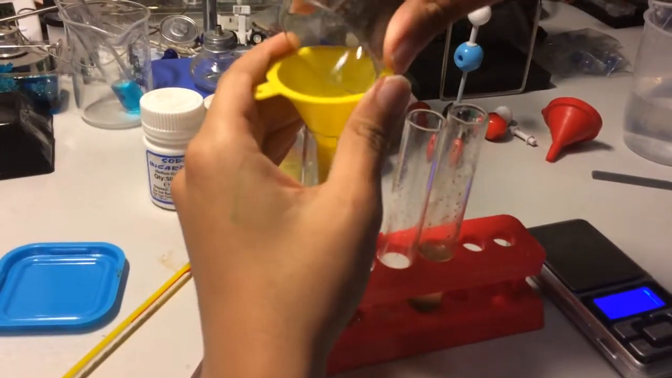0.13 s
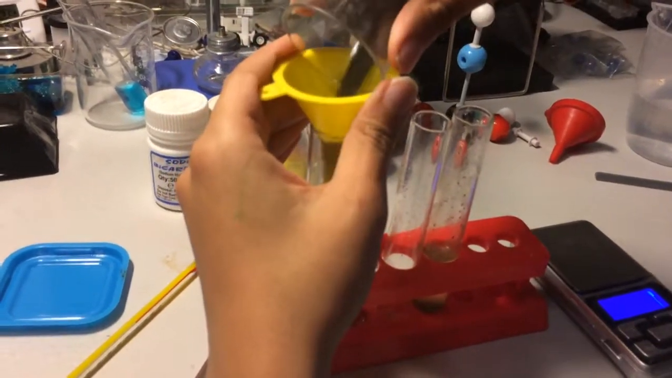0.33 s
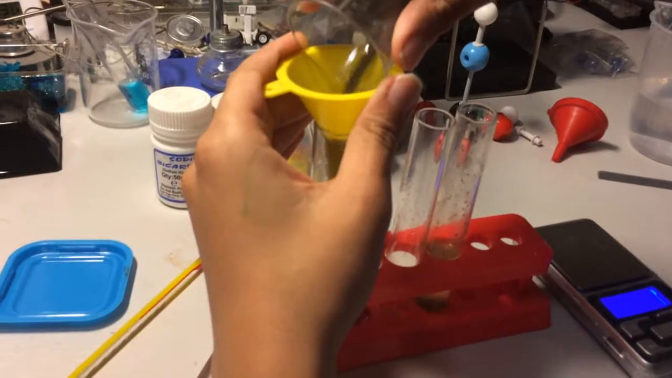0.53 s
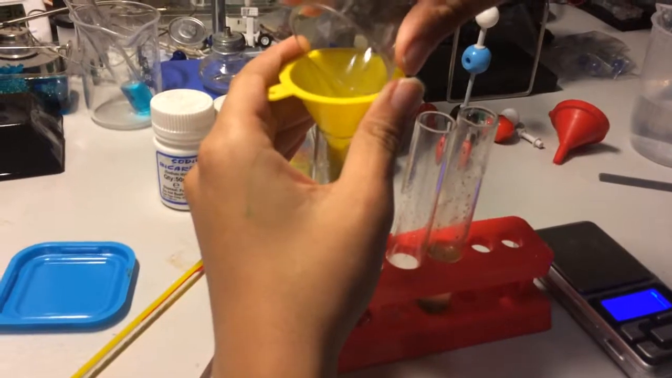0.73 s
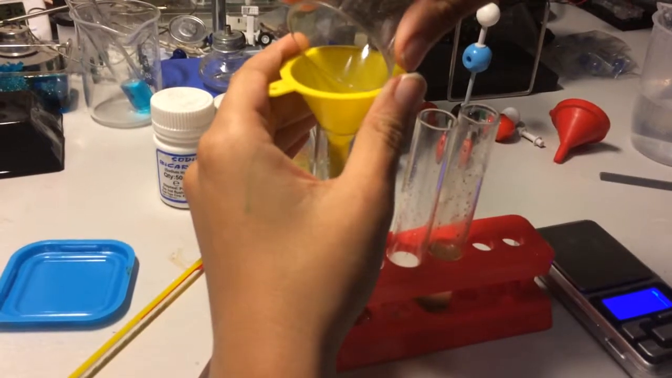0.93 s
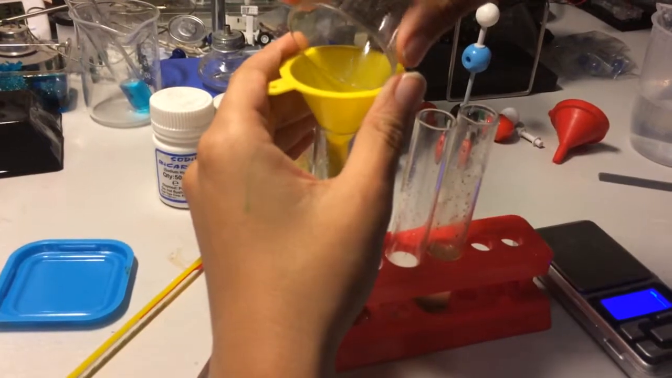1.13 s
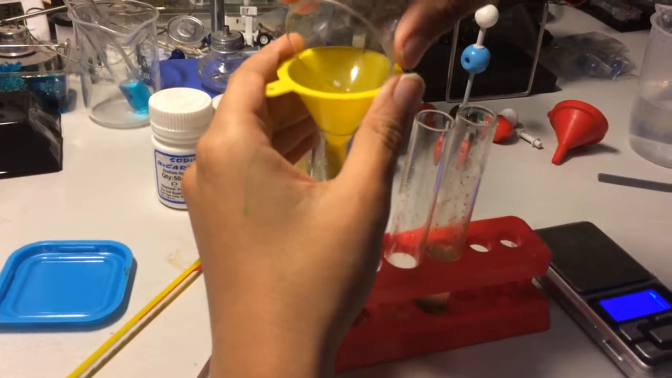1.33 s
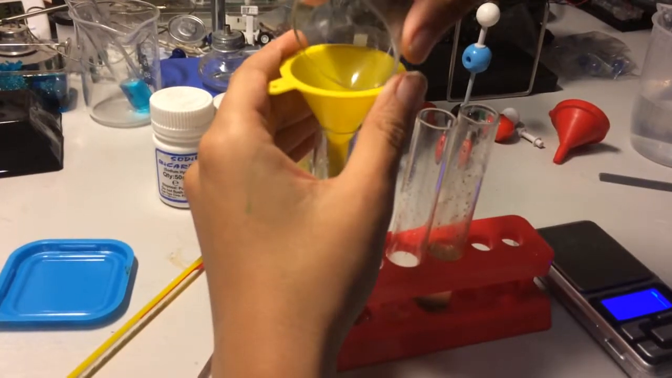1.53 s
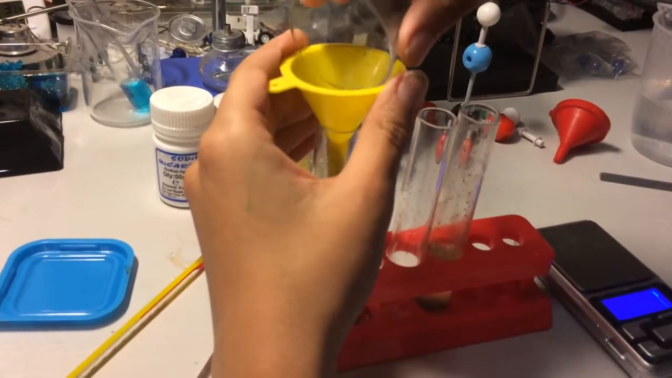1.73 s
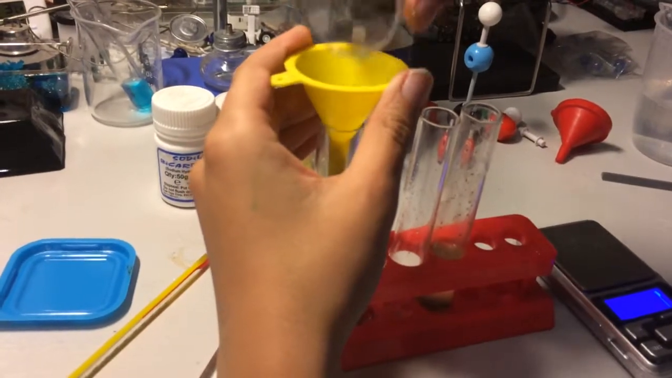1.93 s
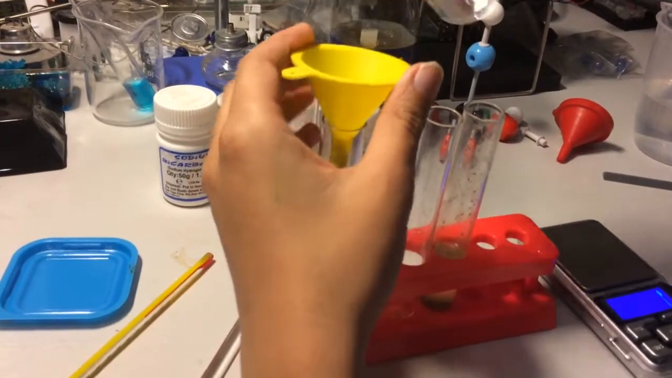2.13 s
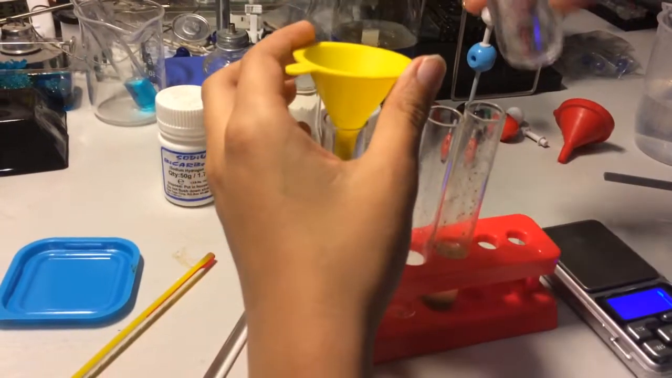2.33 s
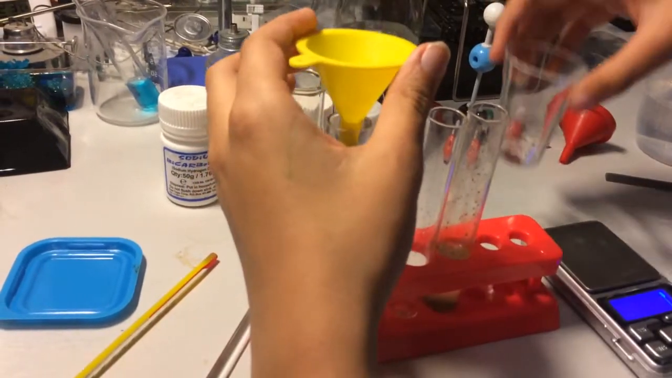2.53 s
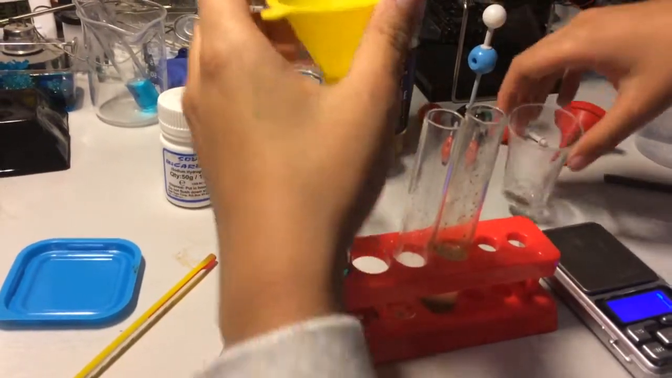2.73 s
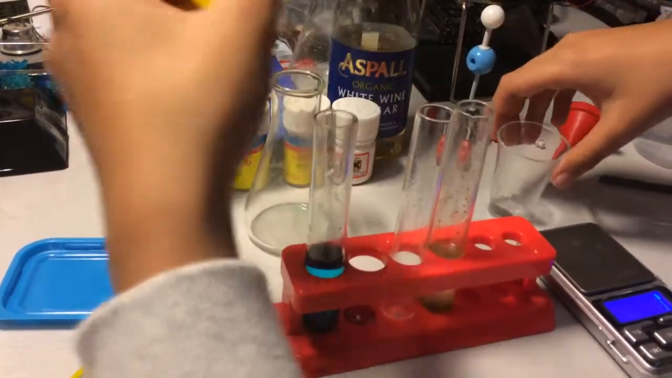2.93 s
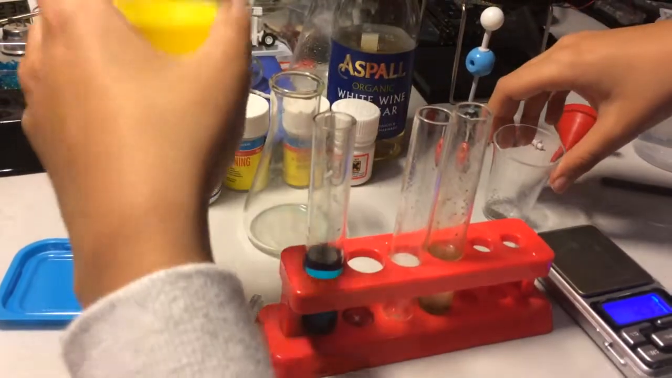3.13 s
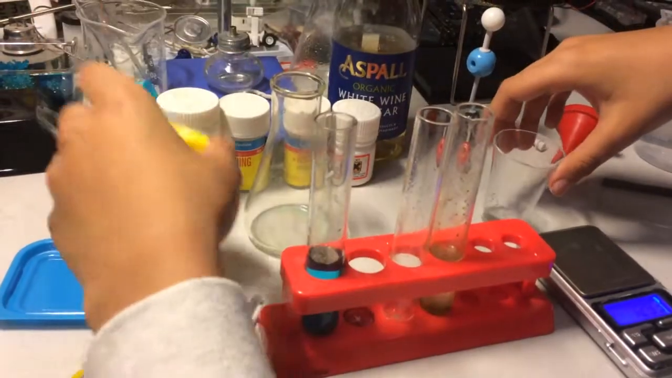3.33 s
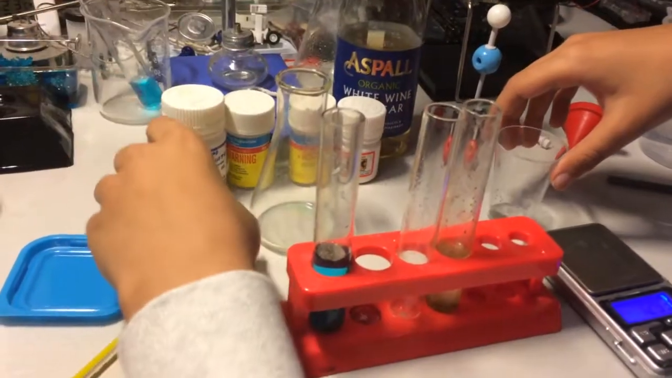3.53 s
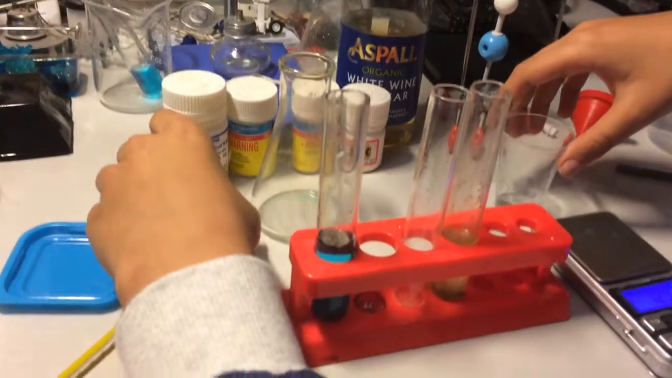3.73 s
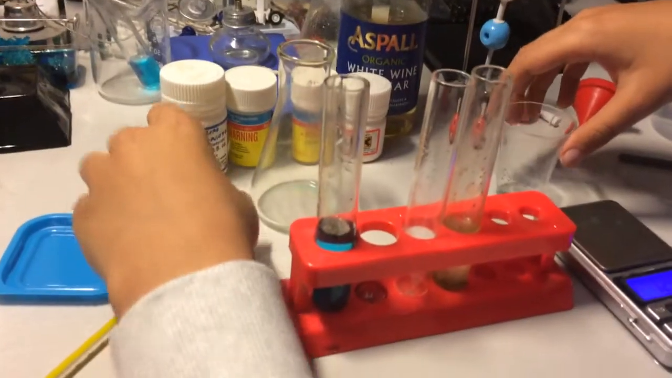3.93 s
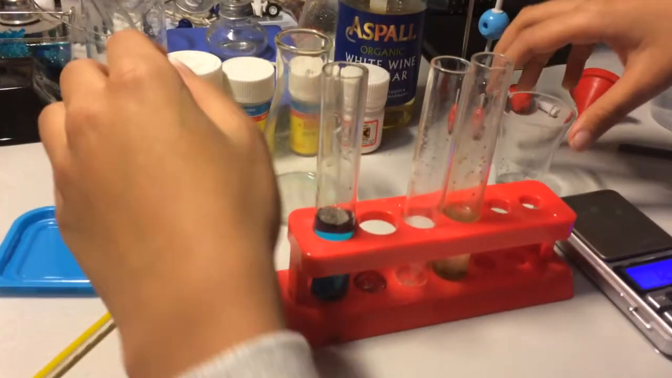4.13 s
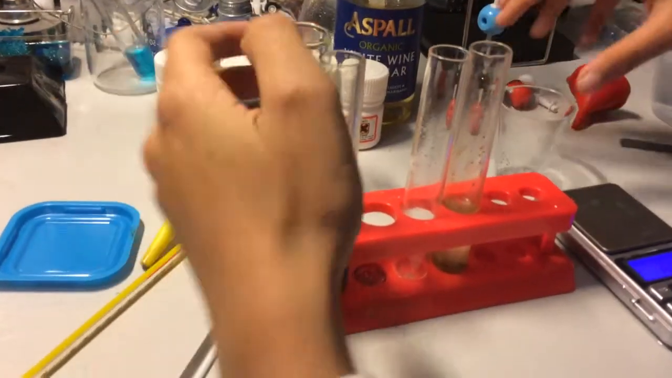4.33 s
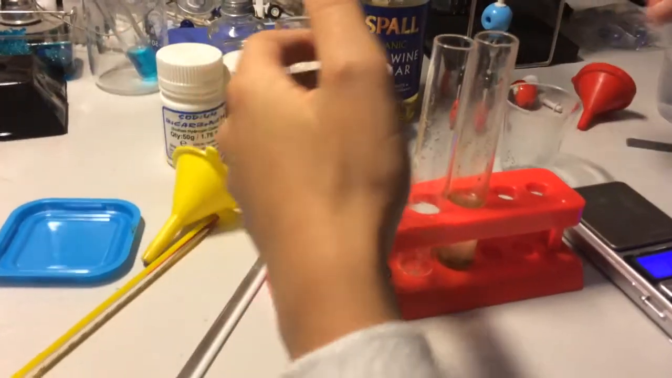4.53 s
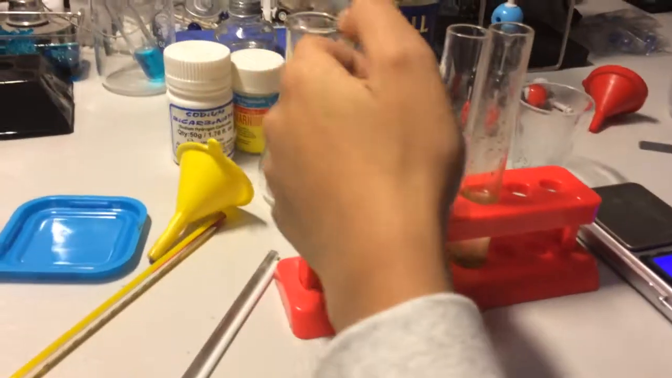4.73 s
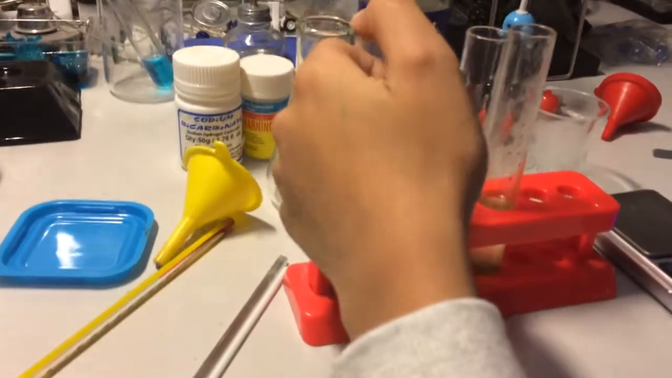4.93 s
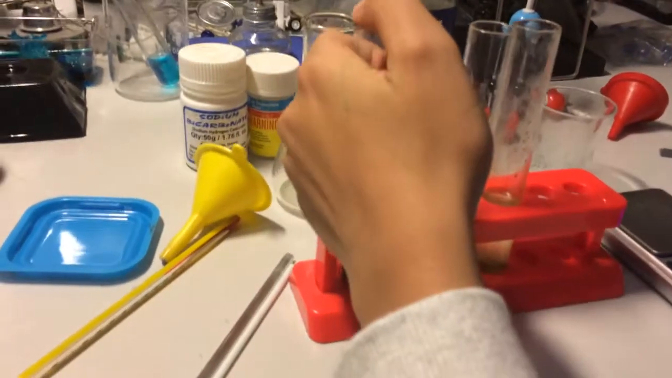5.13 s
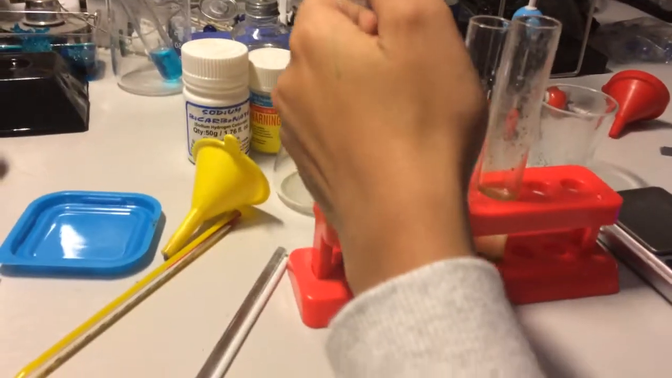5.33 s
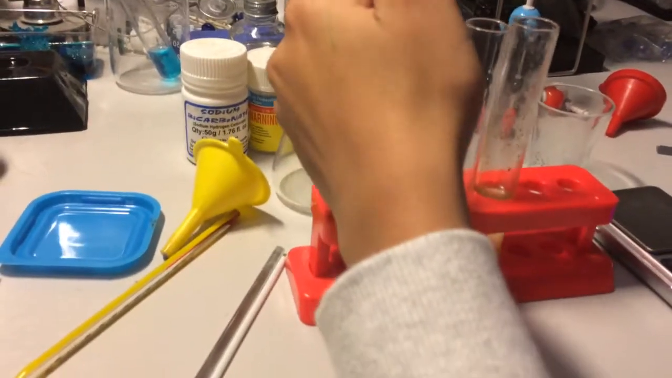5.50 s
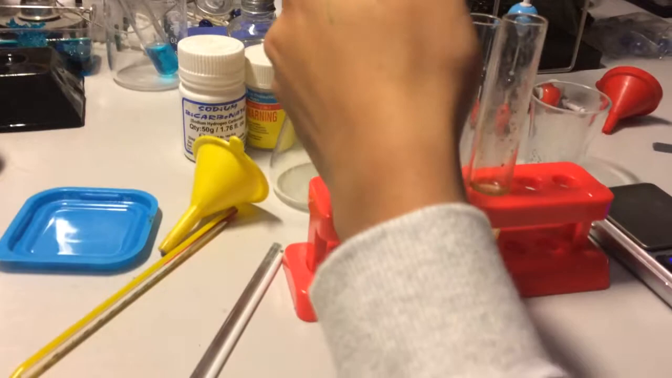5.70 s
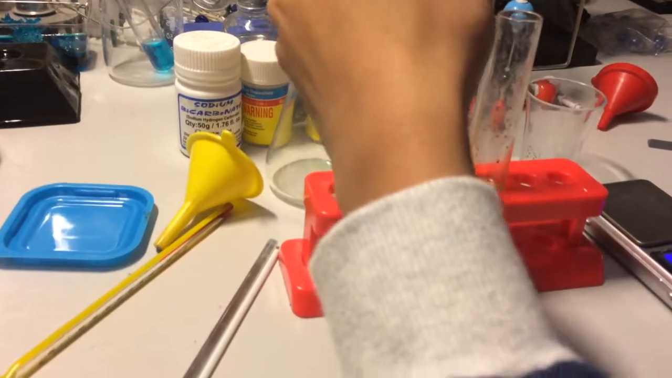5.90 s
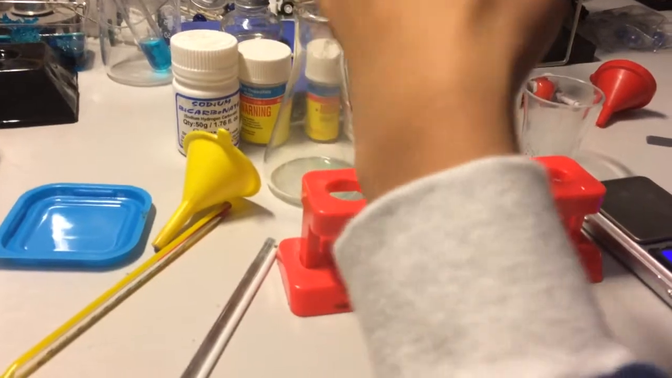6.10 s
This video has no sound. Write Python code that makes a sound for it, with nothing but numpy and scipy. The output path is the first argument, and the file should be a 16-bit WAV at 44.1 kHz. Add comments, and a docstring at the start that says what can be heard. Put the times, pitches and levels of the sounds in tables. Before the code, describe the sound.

Close view of a tabletop in a small room with low, quiet air and mains hum. A very faint grainy hiss of filings fades within a second, followed by light taps on a plastic funnel. A beaker is set down with a sharp chattering knock, then a funnel clacks. Faint distant clicks recur. Finally a glass tube scrapes, knocks hard once in a plastic rack, and rattles, with a tiny clink and squeak.

```python
"""Table in a small room: iron filings hiss from a beaker through a plastic funnel into a test tube (random grains).
The beaker ticks on the funnel and is set down in quick hops; sleeves brush (sparser grains). The tube scrapes,
knocks and rattles in a plastic rack (damped modes and noise cracks), glass clinks on glass and squeaks.
A far switch clicks as echoing noise, over room air and a wavering mains hum."""
import sys
import numpy as np
from scipy import signal
from scipy.fft import rfft, irfft
from scipy.io import wavfile

SR = 44100
rng = np.random.default_rng(int(sys.argv[2]) if len(sys.argv) > 2 else 0)


def wrap_up_sound(samples):
    """Save the sound to the file named by the first command line argument, as 16-bit audio."""
    columns = np.atleast_2d(samples).T
    # keep every value between -1 and 1, then stretch to whole-number steps
    tamed = np.clip(columns, -1, 1)
    steps = np.round(tamed * 32767).astype(np.int16)
    wavfile.write(sys.argv[1], SR, steps)


N = 271700
TIME = np.arange(N) / SR
AGE = np.arange(SR // 2) / SR  # life of one blow, s

# damped thud modes of the rack: freq_hz, level_db, t60_s
RACK_THUD = [(85, -19, .06), (480, -32, .015), (820, -13, .02), (1040, -2, .022), (1420, -7, .019),
             (1900, -15, .012), (2500, -20, .01), (3400, -21, .008), (5400, -19, .006)]


def amp(db):
    """Decibels to gain."""
    return 10 ** (np.asarray(db) / 20)


def unit(x):
    """Scale to rms 1."""
    return x / np.sqrt(np.mean(x ** 2))


def colour(x, points):
    """Filter by (freq_hz, gain_db) points, joined over log frequency; rms 1."""
    hz, db = np.transpose(points)
    bins_hz = np.maximum(np.fft.rfftfreq(len(x), 1 / SR), 1)
    gain = amp(np.interp(np.log(bins_hz), np.log(hz), db))
    return unit(irfft(rfft(x) * gain, len(x)))


def walk(rate_hz):
    """Random wander: straight lines between normal knots, rate_hz knots a second."""
    knots = rng.standard_normal(256)
    return np.interp(TIME * rate_hz, np.arange(len(knots)), knots)


def background(air_db=-61.0, waver_db=0.5):
    """Room air as coloured noise; mains hum and a faint high whine as sines wavering in level and phase."""
    # room air spectrum: freq_hz, density_db
    air_colour = [(25, -20.5), (50, -16.5), (110, -4.5), (150, -10), (210, -8.5), (300, -14.5), (450, -16),
                  (700, -19), (900, -16.5), (1400, -24), (2100, -24), (2900, -32.5), (6000, -37.5),
                  (14000, -42)]
    # steady tones: freq_hz, rms_db
    tones = [(100, -84), (120, -64.5), (212, -76), (240, -81.5), (12050, -88.5)]
    out = colour(rng.standard_normal(N), air_colour) * amp(air_db + .5 * walk(5.3))
    for hz, db in tones:
        level = np.sqrt(2) * amp(db + waver_db * walk(2.9))
        out += level * np.sin(2 * np.pi * hz * TIME + 0.18 * walk(1.1))
    return out


def grains(rate_hz, spread_db):
    """Tiny impacts of unequal size at random times, rate_hz a second on average."""
    hits = rng.random(N) < rate_hz / SR
    return hits * rng.standard_normal(N) * amp(spread_db * rng.standard_normal(N))


def strokes(rows, attack_s, release_s, sag_db_per_s=0):
    """Gain of (start_s, length_s, level_db) moves: each rises, holds or sags, and dies away."""
    gain = np.zeros(N)
    for start_s, length_s, db in rows:
        age = np.clip(TIME - start_s, 0, length_s)
        rise = np.minimum(age / attack_s, 1)
        fall = np.minimum((length_s - age) / release_s, 1)
        gain += amp(db + sag_db_per_s * age) * rise * fall
    return gain


def filings():
    """Dense grain impacts, a thin trickle and the main stream, coloured as a hiss."""
    # hiss spectrum: freq_hz, density_db
    hiss_colour = [(900, -17), (1500, -5), (2300, -12), (2950, 5), (3700, -6), (6000, -7), (9000, -7),
                   (11300, -9), (13000, -1), (14500, -5.5)]
    # trickle and main stream: start_s, length_s, level_db
    pours = [(.04, 0.99, -73.5), (.28, 0.58, -65)]
    hiss = colour(grains(rate_hz=8500, spread_db=0.0), hiss_colour)
    return hiss * strokes(pours, attack_s=0.074, release_s=0.23, sag_db_per_s=-8.5)


def fade(t60_s):
    """Exponential decay by 60 dB in t60_s."""
    return np.exp(-np.log(1000) * AGE / t60_s)


def add(out, start_s, sound):
    """Mix a sound in at a time."""
    start = int(start_s * SR)
    out[start:start + len(sound)] += sound[:N - start]


def switch(t60_s=0.2, echo_s=0.017, echo_width_s=0.0041, echo_db=0, rise_s=0.00039):
    """A far click, mostly reverberation: decaying noise with a strong wall echo; moving arms alter the paths."""
    # clicks: start_s, level_db, snap_db
    clicks = [(1.0732, -44.5, -19), (2.2391, -44.5, -19), (2.3121, -54.5, 9.5), (2.7707, -43, -18),
              (4.3448, -43, -18), (4.668, -41.5, -21), (4.8010, -43, -23), (4.856, -48, -28),
              (4.9931, -42, -27), (5.0835, -44, -41), (5.3034, -43, -41)]
    # body spectrum: freq_hz, density_db
    body_colour = [(150, -20.5), (500, -2.5), (1100, -10.5), (1450, -0.5), (1650, -7.5), (1900, 1.5),
                   (2300, -2.5), (2750, -11.5), (3550, -2), (4700, -9), (5800, -28.5), (6500, -16.5),
                   (7400, -55.5), (13500, -27)]
    # snap spectrum: freq_hz, density_db
    snap_colour = [(500, -1), (1800, -13.5), (2400, -5.5), (3600, -1.5), (5300, -1), (7200, -8),
                   (8350, -2.5), (9000, -6), (10000, -8), (10700, -23), (11600, -10), (12300, -3.5),
                   (13200, -24)]
    out = np.zeros(N)
    paths = rng.standard_normal(len(AGE))
    echo = amp(echo_db) * np.exp(-((AGE - echo_s) / echo_width_s) ** 2)
    echo += .5 * np.clip((AGE - echo_s) / 0.002, 0, 1)  # denser tail after the echo
    shape = fade(t60_s) * (1 + echo) * np.minimum(AGE / rise_s, 1)
    for start_s, db, snap_db in clicks:
        now = paths + rng.standard_normal(len(AGE))  # shared paths plus fresh ones
        click = colour(now, body_colour) + amp(snap_db) * colour(now, snap_colour)
        add(out, start_s, amp(db) * shape * click)
    return out


def soften(x, hz, order=2):
    """Low-pass: a longer contact takes the treble out of a blow."""
    return signal.sosfilt(signal.butter(order, min(hz, SR / 2.2), fs=SR, output="sos"), x)


def radiate(x, hz, order=1):
    """High-pass: small objects radiate little bass."""
    return signal.sosfilt(signal.butter(order, hz, "highpass", fs=SR, output="sos"), x)


def ring(modes, scatter):
    """Sum of decaying sine modes; scatter is the random phase range in cycles."""
    out = np.zeros(len(AGE))
    for hz, db, t60_s in modes:
        out += amp(db) * fade(t60_s) * np.sin(2 * np.pi * (hz * AGE + scatter * rng.random()))
    return out


def room(x, wet_db, t60_s, bright_hz):
    """Direct sound plus the short, dense noise tail of a small furnished room."""
    onset = np.clip((AGE - .002) / 0.0035, 0, 1)
    tail = soften(rng.standard_normal(len(AGE)), bright_hz) * fade(t60_s) * onset
    tail /= np.sqrt(np.sum(tail ** 2))
    return x + amp(wet_db) * signal.fftconvolve(x, tail)[:N]


def ticks(upper_t60_s=0.0055, crack_t60_s=0.018):
    """Hand-damped taps on the funnel: two short resonances and a noise crack."""
    # taps: start_s, level_db, ring_hz, ring_t60_s, upper_hz, upper_db, crack_db, contact_hz
    taps = [(1.632, -41.5, 1280, 0.01, 2930, -7, -10, 5000), (1.6709, -38, 1342, 0.04, 3030, 3, -4, 5500),
            (1.8402, -47, 1390, .015, 3000, -6, -11, 5000),
            (1.8589, -32, 1360, 0.025, 2900, 0.5, -12.5, 5950),
            (2.8676, -35, 894, 0.052, 1410, -6, 0, 1980), (3.5999, -52.5, 3540, 0.0077, 5160, 4, 0, 12800),
            (3.61, -41.5, 1190, 0.01, 3580, -1, -8, 11560), (3.9541, -37.5, 833, 0.021, 2840, 3, 1.5, 6950),
            (4.004, -21.5, 1820, 0.0056, 2400, -6.5, -15.5, 2900),
            (4.005, -28.5, 3260, 0.0091, 1480, -18.5, -4, 3600)]
    out = np.zeros(N)
    for start_s, db, hz, t60_s, upper_hz, upper_db, crack_db, contact_hz in taps:
        body = ring([(hz, 0, t60_s), (upper_hz, upper_db, upper_t60_s)], 0)
        crack = amp(crack_db) * rng.standard_normal(len(AGE)) * fade(crack_t60_s)
        add(out, start_s, amp(db) * soften(body + crack, contact_hz, order=4))
    return room(radiate(out, hz=754), wet_db=-11.5, t60_s=0.11, bright_hz=6990)


def brush():
    """Sleeve and fingers brushing: uneven grains, one stroke for each move of the arm."""
    # brushing spectrum: freq_hz, density_db
    cloth_colour = [(200, -10), (500, 1.5), (900, -5), (1500, -2.5), (2400, -15.5), (5000, -18),
                    (8000, -19.5), (14000, -28.5)]
    # arm moves: start_s, length_s, level_db
    moves = [(2.66, 0.39, -65), (3.24, 0.11, -65.5), (4.81, 0.11, -59), (5.24, 0.455, -60.5),
             (5.8, 0.073, -57)]
    rustle = colour(grains(rate_hz=3300, spread_db=4.5), cloth_colour)
    return rustle * strokes(moves, attack_s=0.024, release_s=.05)


def blow(thud, modes, contact_hz, ring_db, crack_db, crack_t60_s, tick_db, tick_t60_s, order=2):
    """Crack, damped thud and thin ring, dulled by the contact, under the bright noise tick of hard glass."""
    crack = amp(crack_db) * rng.standard_normal(len(AGE)) * fade(crack_t60_s)
    body = ring(thud, 0) + crack + amp(ring_db) * ring(modes, 0.88)
    hardness = min(contact_hz / 3000, 1) ** 2  # softer contacts tick less
    tick = amp(tick_db) * hardness * rng.standard_normal(len(AGE)) * fade(tick_t60_s)
    return soften(body, contact_hz, order) + soften(tick, hz=8500)


def beaker(count=4):
    """The base lands on its edge and chatters flat in ever shorter, weaker hops."""
    # landings: start_s, level_db, contact_hz, ring_db, first_hop_s, hop_ratio, step_per_hop_db
    landings = [(2.944, -35.5, 1500, -18, 0.00243, 0.81, -1), (2.962, -9.5, 6000, -4, .0053, .62, -0.5),
                (3.3912, -25.5, 1290, 9, .0046, .57, -1.5)]
    # broad thud modes: freq_hz, level_db, t60_s
    thud = [(400, -17, .035), (620, -28, .02), (1130, -13, .015), (1530, -2, .019), (1900, -5, .012),
            (2550, -11, .012), (3100, -17, .012), (5100, -18, .012), (7800, -22, .006), (10700, -4, .009)]
    # thin ring modes: freq_hz, level_db, t60_s
    modes = [(361, -29, .11), (404, -24, .1), (576, -30, .11), (694, -33, .11), (877, -31, .11),
             (958, -33, .11), (1082, -28, .11), (1136, -22, .1), (1314, -28, .12), (1420, -24, .1),
             (1516, -10, .1), (1760, -26, .11), (1927, -20, .08), (2202, -22, .06), (2471, -29, .07),
             (2627, -26, .06), (10640, -33, .12)]
    hop_contact_hz, hop_ring_step_db = 2880, -4  # hops: contact cut-off at most this, less ring each time
    out = np.zeros(N)
    for start_s, db, contact_hz, ring_db, first_hop_s, hop_ratio, step_db in landings:
        for k in range(count):
            hit = blow(thud, modes, contact_hz, ring_db + k * hop_ring_step_db, crack_db=-16.5,
                       crack_t60_s=0.031, tick_db=-35, tick_t60_s=0.018, order=3)
            add(out, start_s, amp(db + k * step_db) * hit)
            start_s += first_hop_s * hop_ratio ** k
            contact_hz = min(contact_hz, hop_contact_hz)
    return room(radiate(out, hz=385, order=3), wet_db=-11, t60_s=0.17, bright_hz=8300)


def rack_blow(contact_hz, ring_db, pitch_ratio):
    """One contact of glass and rack; the spot that is struck sets the pitch of the thud."""
    # thin ring modes: freq_hz, level_db, t60_s
    modes = [(390, -27, .12), (506, -33, .1), (610, -31, .1), (784, -22, .09), (852, -23, .1),
             (975, -23, .1), (1076, -18, .09), (1220, -20, .09), (1332, -22, .1), (1448, -20, .08),
             (1510, -19, .09), (1790, -26, .1), (1911, -27, .09), (2546, -31, .08), (3085, -32, .06)]
    thud = np.array(RACK_THUD) * [pitch_ratio, 1, 1]
    return blow(thud, modes, contact_hz, ring_db, crack_db=-7.5, crack_t60_s=0.044,
                tick_db=-15.5, tick_t60_s=0.018)


def rack(count=3, table_db=-11, table_hz=210):
    """The tube scrapes and knocks on its hole's rim and hits bottom; knocks rattle, the table top carries bass."""
    # tube knocks: start_s, level_db, contact_hz, ring_db, pitch_ratio, rattle_db
    knocks = [(4.8373, -32, 1900, -6, 1.17, -23), (4.875, -28.5, 2200, 0, 1.46, -19),
              (5.1177, -34, 1370, -8, 0.82, -33), (5.146, -38, 1700, -6, 1.15, -25),
              (5.236, -37, 2700, -17, 1.55, -17), (5.2852, -32.5, 1100, -1, 0.8, -16),
              (5.3406, -35, 2200, -16, 1.04, -18), (5.376, -19, 3700, -19, 1.24, -37),
              (5.4172, -19.5, 3300, -14, 1.4, -26), (5.4257, -3.2, 2940, -3.5, 1.02, -8.3),
              (5.5285, -35.5, 1600, -4, 0.89, -12), (5.5757, -41.5, 2000, 6.5, 1.25, -14),
              (5.603, -32.5, 1400, -18, 0.73, -28), (5.6265, -25.5, 3540, -3, 0.99, -11)]
    # glass pushed along the rim: start_s, length_s, level_db
    scrapes = [(4.85, 0.052, -55.5), (5.175, 0.04, -49), (5.252, 0.15, -52), (5.635, 0.05, -53.5)]
    # the tube lifts off, then rattles back at a steady rate, a little higher and with less ring
    rebound_s, rattle_gap_s, rattle_step_db = .0126, 0.0051, -0.3
    rattle_pitch_ratio, rattle_ring_db = 1.22, -5
    slip = soften(ring(RACK_THUD, 0), hz=2300)
    slips = signal.fftconvolve(grains(rate_hz=220, spread_db=3), slip)[:N]
    out = unit(slips) * strokes(scrapes, attack_s=.01, release_s=.02)
    for start_s, db, contact_hz, ring_db, pitch_ratio, rattle_db in knocks:
        add(out, start_s, amp(db) * rack_blow(contact_hz, ring_db, pitch_ratio))
        for k in range(count):
            hit = rack_blow(contact_hz, ring_db + rattle_ring_db, pitch_ratio * rattle_pitch_ratio)
            hit_s = start_s + rebound_s + k * rattle_gap_s
            add(out, hit_s, amp(db + rattle_db + k * rattle_step_db) * hit)
    table = radiate(soften(out, table_hz, order=3), hz=90, order=2)
    heard = radiate(out, hz=630, order=3) + amp(table_db) * table
    return room(heard, wet_db=-10.0, t60_s=0.16, bright_hz=12600)


def clink(start_s=5.0045, level_db=-43.5):
    """One glass tube grazes another: a tiny, high ring of decaying modes."""
    # glass modes: freq_hz, level_db, t60_s
    modes = [(7300, 0, .02), (10800, -13, .09), (11200, -4, .025), (12900, -1, 0.046)]
    out = np.zeros(N)
    add(out, start_s, amp(level_db) * ring(modes, 0))
    return out


def squeaks(rise_per_s=.6):
    """Glass sticks and slips in the rack's hole: short unsteady tones, rising as the glass speeds up."""
    # squeaks: start_s, length_s, slip_rate_hz, level_db, overtone_db
    slides = [(5.162, 0.024, 595, -39.5, -3), (5.72, 0.11, 555, -55.5, -33)]
    out = np.zeros(N)
    for start_s, length_s, hz, db, overtone_db in slides:
        age = np.clip(TIME - start_s, 0, length_s)
        slip_hz = hz * (1 + rise_per_s * age + 0.01 * walk(36))
        phase = 2 * np.pi * np.cumsum(slip_hz) / SR
        swell = np.sin(np.pi * age / length_s)
        out += amp(db) * swell * (np.sin(phase) + amp(overtone_db) * np.sin(2 * phase))
    return room(out, wet_db=-17, t60_s=.2, bright_hz=5020)


def scene():
    """Sum of all sources, in one channel."""
    handling = filings() + ticks() + brush() + beaker()
    tube = rack() + clink() + squeaks()
    return (background() + switch() + handling + tube)[None]


def record(dry):
    """Steep elliptic low-pass: nearly nothing is left above the cut-off."""
    top_hz = 14500
    return signal.sosfilt(signal.ellip(10, .2, 70, top_hz, fs=SR, output="sos"), dry)


dry = scene()
out = record(dry)
wrap_up_sound(out)
```